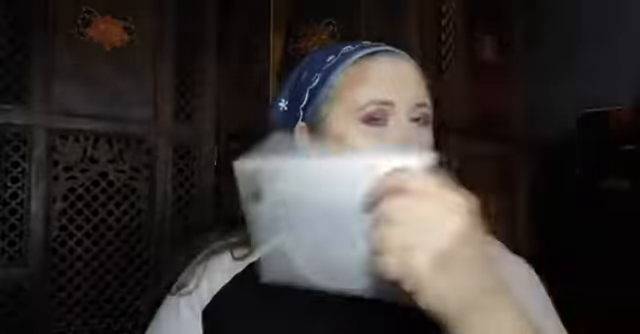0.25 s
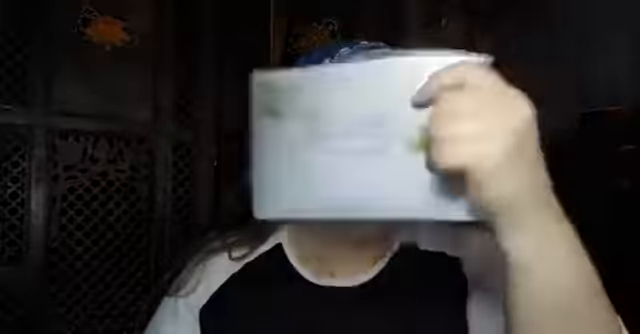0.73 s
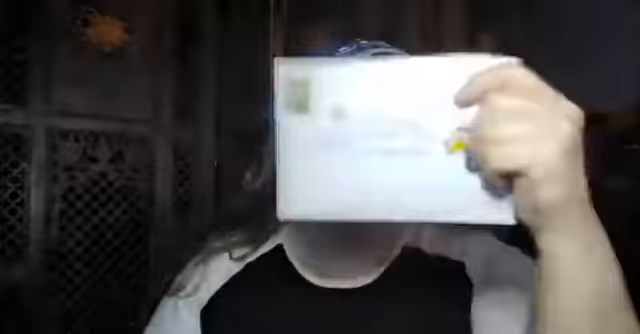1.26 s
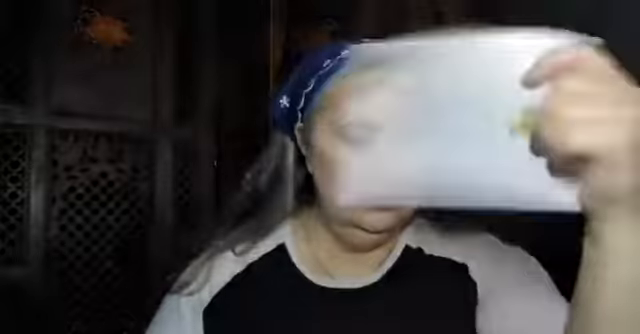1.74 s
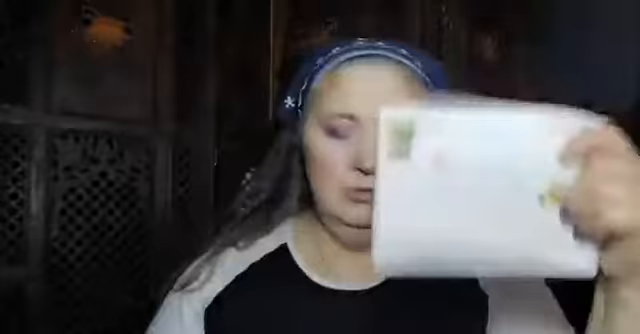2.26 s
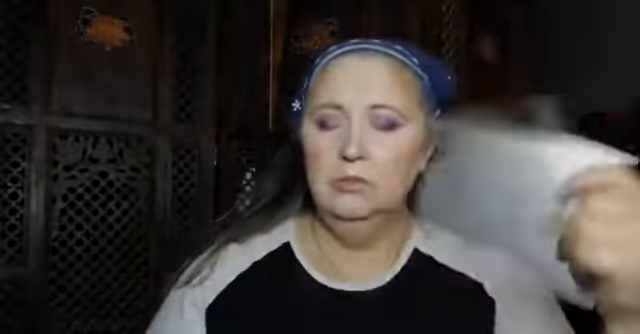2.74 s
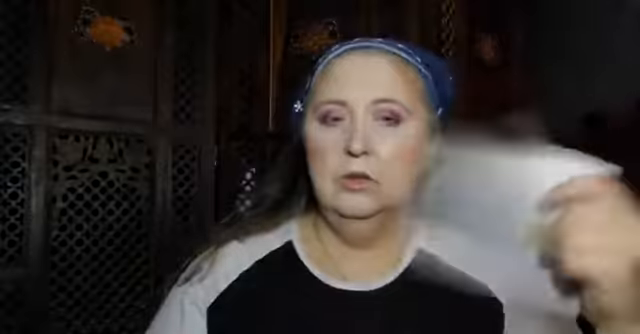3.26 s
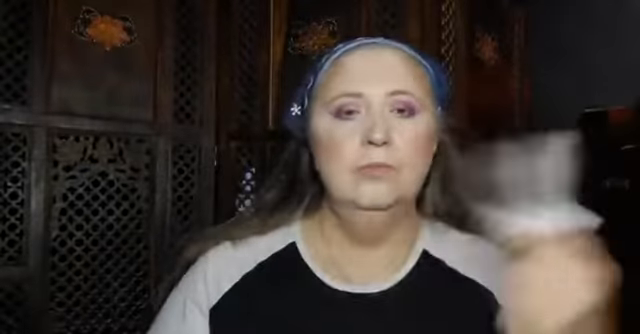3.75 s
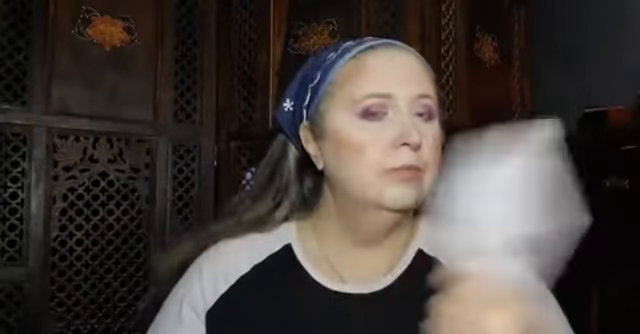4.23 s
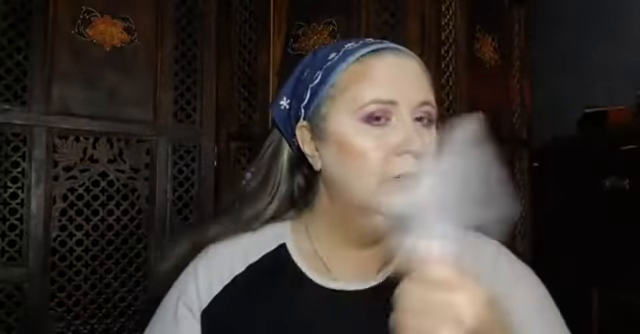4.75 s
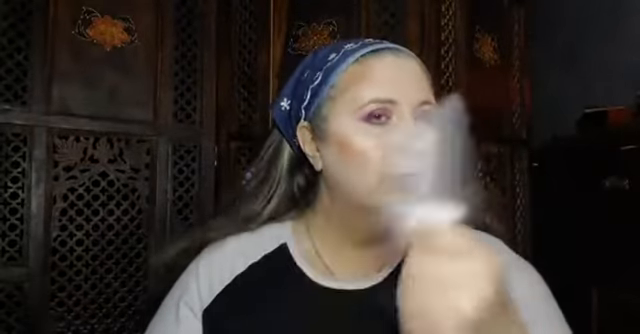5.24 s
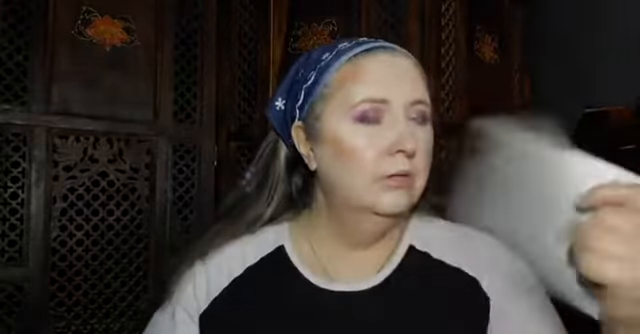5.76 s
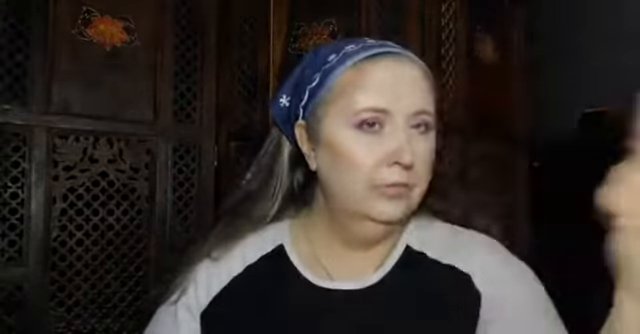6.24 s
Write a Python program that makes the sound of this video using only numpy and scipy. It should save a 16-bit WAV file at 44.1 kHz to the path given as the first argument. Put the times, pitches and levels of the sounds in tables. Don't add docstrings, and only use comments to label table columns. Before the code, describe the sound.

Rapid, even flapping of stiff paper close by, soft low puffs and dry crinkles at each turn, then two sharp cracks late on.

```python
import sys
import numpy as np
from scipy import signal
from scipy.fft import rfft, irfft
from scipy.io import wavfile
from scipy.ndimage import uniform_filter1d

SR = 44100
rng = np.random.default_rng(int(sys.argv[2]) if len(sys.argv) > 2 else 0)


def unload_wav(signal):
    wavfile.write(
        sys.argv[1],
        SR,
        np.round(np.clip(np.atleast_2d(signal).T, -1, 1) * 32767).astype(np.int16),
    )


def ratio_of_db(decibels):
    return 10 ** (np.asarray(decibels, float) / 20)


N = 286650

# (t/s, puff peak level/dB, rustle level/dB, creak level of the stroke that follows/dB)
TURNS = [(0.1116, -36.5, -55.5, -62.5), (0.372, -43.5, -56.5, -75), (0.63, -29.5, -49, -56),
         (0.8753, -33.5, -48, -60.5), (1.13, -31.5, -49, -68), (1.384, -29.5, -48, -58.5),
         (1.6411, -36, -50.5, -58.5), (1.9028, -34.5, -48.5, -53), (2.1514, -41.5, -53.5, -58.5),
         (2.4134, -29, -47.5, -58.5), (2.6718, -30, -48, -55.5), (2.921, -26, -47.5, -55),
         (3.1795, -32, -50, -57.5), (3.4327, -29.5, -51.5, -65.5), (3.688, -27, -49, -60.5),
         (3.9324, -30, -52.5, -62), (4.1755, -28, -51.5, -58.5), (4.4284, -36, -54.5, -60.5),
         (4.682, -32.5, -52, -43.5), (4.936, -46, -57, -73), (5.204, -40.5, -54.5, -56.5),
         (5.449, -34.5, -52, -60), (5.7026, -27.5, -47, -64), (5.992, -44, -58.5, -70.5),
         (6.2523, -31.5, -51, -58.5)]
# (t/s, peak level/dB, brightness/dB, length/s, bending of the whole card/dB)
HARD_SNAPS = [
    (4.7023, -20.5, -9, 0.024, -4.5),
    (5.713, -19.5, -8, 0.022, -1),
]
# (f/Hz, level/dB, time to fall 60 dB/s)
BENDING = [(205, -8, .03), (330, -3, .045), (540, 0, .045), (630, -7, .03)]
# (f/Hz, likeness from 0 to 1)
LIKENESS = [(60, 1), (300, 0.82), (640, 0.42), (1400, 0.094), (3000, 0.055), (15000, 0.16)]


def at_hz(points, hz):
    table_hz, values = np.transpose(points)
    return np.interp(np.log(hz), np.log(table_hz), values)


def rms_one(x):
    return x / np.sqrt(np.mean(x ** 2) + 1e-20)


def sides(pan_db):
    return ratio_of_db(np.array([pan_db / 2, -pan_db / 2]))[:, None]


def band(x, low_hz, high_hz):
    return signal.sosfilt(signal.butter(2, [low_hz, high_hz], "band", fs=SR, output="sos"), x)


def ring(x, modes):
    out = 0
    for hz, level_db, t60_s in modes:
        decay = ratio_of_db(-60 / (t60_s * SR))
        turn = 2 * np.pi * hz / SR
        push = [0, ratio_of_db(level_db) * np.sin(turn)]
        out = out + signal.lfilter(push, [1, -2 * decay * np.cos(turn), decay ** 2], x + 1e-18)
    return out


def add(out, piece, s):
    i = round(s * SR)
    out[:, i:i + piece.shape[1]] += piece[:, :N - i]


def swell(t, rise_s, hold_s, fall_s):
    return np.exp(np.minimum(t, 0) / rise_s - np.maximum(t - hold_s, 0) / fall_s)


def coloured(spectrum, grain_db):
    hz = np.maximum(np.fft.rfftfreq(N, 1 / SR), 1)
    clumps = np.repeat(rng.standard_normal(N // 32 + 1), 32)[:N]
    mid, side = rfft(rng.standard_normal((2, N)) * ratio_of_db(grain_db * clumps))
    alike = np.clip(at_hz(LIKENESS, hz), 0, 1)
    both = np.sqrt(1 + alike) * mid + np.sqrt(1 - alike) * side * [[1], [-1]]
    outside = (hz > 1.5 * spectrum[-1][0]) | (hz < spectrum[0][0] / 1.5)
    shape_db = at_hz(spectrum, hz) - 30 * outside
    return rms_one(irfft(both * ratio_of_db(shape_db), N))


def patchy(x, patch_db):
    hz, _, cells = signal.stft(x, SR, nperseg=512)
    field = rng.standard_normal(cells.shape[1:])
    field = uniform_filter1d(field, size=3, axis=0)
    field = uniform_filter1d(field, size=9, axis=1)
    dips = np.minimum(rms_one(field), .5)
    patchy_below_hz = 7500
    depth_db = patch_db / (1 + (hz[:, None] / patchy_below_hz) ** 4)
    return signal.istft(cells * ratio_of_db(depth_db * dips), nperseg=512)[1][:, :N]


def flutter(step_s, depth_db):
    knots = np.arange(0, N / SR + 1, step_s)
    return ratio_of_db(depth_db * np.interp(np.arange(N) / SR, knots, rng.standard_normal(len(knots))))


def creak():
    # (f/Hz, level per Hz/dB)
    creak_colour = [(300, -7.5), (600, 5), (950, -19.5), (1250, -12), (2100, -7.5), (3300, -11),
                    (4500, -9.5), (6000, -19.5), (9000, -19.5)]
    hiss_colour = [(1000, -37), (2000, -9.5), (4400, -4), (6050, -6), (7300, -4), (13600, -4), (16500, 1)]
    air_colour = [(15, -52), (28, -1.5), (55, 2), (112, 1), (200, -14.5), (330, -14), (530, -23.5),
                  (750, -26.5), (1000, -40), (2000, -42.5)]
    # (t/s, hiss level at rest/dB, swell of the hiss with the stroke/dB)
    hiss_drift = [(0.0, -66.5, -1), (0.45, -68.5, -1.5), (0.69, -68, -4), (0.78, -71, 7), (2.01, -77.5, 15.5),
                  (2.08, -71.5, 8), (2.66, -72.5, 6.5), (3.33, -68.5, 4.5), (3.71, -70, 1.5),
                  (4.09, -66.5, 3), (5.09, -72, 3.5), (5.63, -68.5, 3.5), (6.01, -75.5, 8), (6.5, -72, 13)]
    fastest_s, slowest_s = 0.075, 0.22
    rest_db, typical_db = -82.5, -62

    t = np.arange(N) / SR
    s, _, _, stroke_db = np.transpose(TURNS)
    moments = np.ravel([s + fastest_s, s + slowest_s], order="F")
    speed = np.interp(t, np.r_[0, moments], np.r_[0, np.tile([1, 0], len(s))])
    strength_db = np.interp(t, s + fastest_s, stroke_db)
    creak_db = rest_db + speed * (strength_db - rest_db)
    crackle = ratio_of_db(creak_db - 2.5) * patchy(coloured(creak_colour, grain_db=2.5), patch_db=11)

    when, hiss_rest_db, swell_db = np.transpose(hiss_drift)
    stroke_swell_db = np.interp(t, when, swell_db) + 0.14 * (strength_db - typical_db)
    hiss_db = np.interp(t, when, hiss_rest_db) + 2.5 + speed * stroke_swell_db
    hiss = ratio_of_db(hiss_db) * patchy(coloured(hiss_colour, grain_db=1), patch_db=8)
    hiss = hiss * flutter(.012, depth_db=1.5)

    stirred_air = ratio_of_db(-52 + 1.5 * speed) * coloured(air_colour, grain_db=1)
    return sides(-2.36) * (crackle + hiss + stirred_air)


def turns():
    # (f/Hz, level per Hz/dB)
    rustle_colour = [(600, -14), (950, -13.5), (1500, -9), (2070, -0.5), (2900, -14.5), (3600, -12.5),
                     (4500, -5), (6000, -16.5)]
    sizzle_colour = [(3000, -22), (6000, -9.5), (7400, -4.5), (10000, -6.5), (13600, -9), (16500, -4)]
    puff_hz, puff_s, puff_lag_s = 108, .0047, .0018
    pan_db, swell_s, lead_s = -3, .0055, .04

    t = np.arange(round(.12 * SR)) / SR - lead_s
    puff = -np.cos(2 * np.pi * puff_hz * t) * np.exp(-.5 * ((t - puff_lag_s) / puff_s) ** 2)
    puff -= 0.45 * np.exp(-.5 * ((t - .013) / 0.0031) ** 2)
    throb = ratio_of_db(2 * np.cos(2 * np.pi * puff_hz * (t + .001)))
    shake_swell = swell(t, 0.0071, 0.0092, 0.0066)
    rustle_swell = throb * swell(t + 0.00028, swell_s, 0.013, 0.0098)
    sizzle_swell = swell(t + 0.0005, swell_s, 0.012, 0.009)

    air, shake, rustle, sizzle = np.zeros((4, 2, N))
    for s, puff_db, rustle_db, _ in TURNS:
        bend_db = -49.5 + 0.44 * (puff_db + 31) + 0.17 * (rustle_db + 45)
        add(air, sides(-2.8) * ratio_of_db(puff_db) * puff, s - lead_s)
        add(shake, sides(pan_db) * ratio_of_db(bend_db) * shake_swell, s - lead_s)
        add(rustle, sides(pan_db) * ratio_of_db(rustle_db - 1) * rustle_swell, s - lead_s)
        add(sizzle, sides(pan_db) * ratio_of_db(rustle_db + 1) * sizzle_swell, s - lead_s)

    force = shake * (rng.standard_normal(N) + 0.068 * rng.standard_normal((2, N)))
    bending = ratio_of_db(-20) * ring(force, BENDING) + ratio_of_db(17.5) * band(force, 137, 516)
    creases = flutter(.0025, depth_db=3.5)
    rustling = creases * rustle * patchy(coloured(rustle_colour, grain_db=1.5), patch_db=7)
    sizzling = creases * sizzle * coloured(sizzle_colour, grain_db=2.5)
    return air, bending + rustling + sizzling


def snaps():
    # (t/s, peak level/dB, brightness/dB, length/s)
    whips = [(0.163, -47.5, -28, 0.021), (0.42, -50, -28, 0.016), (0.6827, -44, -20, 0.03),
             (0.9323, -34, -37, 0.012), (1.1828, -40, -41, 0.023), (1.444, -37, -21, 0.014),
             (1.698, -32, -50, 0.011), (1.9633, -33.5, -34, 0.015), (2.205, -43, -27, 0.0075),
             (2.471, -45, -13, 0.02), (2.727, -46, -20, 0.022), (2.975, -46.5, -15, 0.025),
             (3.275, -56, -17, .0088), (3.484, -48, -20, 0.019), (3.737, -48, -21, 0.026),
             (3.977, -52, -19, 0.033), (4.4775, -44, -19, 0.0065), (5.261, -48.5, -20, 0.011),
             (5.502, -46.5, -48, 0.021), (6.295, -42, -34, 0.023)]
    # (t/s, peak level/dB)
    ticks = [(0.231, -56), (0.969, -57), (1.2287, -54.5), (1.981, -61), (2.505, -52.5), (2.7667, -54),
             (4.5216, -59.5), (5.542, -59), (5.5987, -52.5), (5.7912, -39.5), (6.101, -56.5), (6.345, -68)]
    # (f/Hz, level/dB, time to fall 60 dB/s)
    crinkle_modes = [(1350, -3, .007), (1650, -4, .006), (2150, -1, .006), (2650, -2, .006),
                     (3400, -3, .005), (4600, -3, .004)]
    snap_bend_db, snap_pan_db = -7.5, -1
    tick_bright_db, tick_s, tick_bend_db, tick_pan_db = -14, 0.02, 1, -3.5

    events = [(*row, snap_pan_db) for row in HARD_SNAPS]
    events += [(*row, snap_bend_db, snap_pan_db) for row in whips]
    events += [(*row, tick_bright_db, tick_s, tick_bend_db, tick_pan_db) for row in ticks]
    hard_times = [row[0] for row in HARD_SNAPS]

    t = np.arange(round(.08 * SR)) / SR
    low, mid, top = np.zeros((3, 2, N))
    for s, peak_db, bright_db, length_s, bend_db, pan_db in events:
        size, both, left, right = rng.standard_normal((4, len(t)))
        rise_s = .0004 * ratio_of_db(.8 * abs(-35 - peak_db))
        fade = (1 - np.exp(-t / rise_s)) * np.exp(-3 * t / max(length_s, .002))
        dying = sides(pan_db) * ratio_of_db(peak_db) * fade
        clumps = ratio_of_db(3 * np.repeat(size[::24], 24)[:len(t)])
        spray = dying * rms_one(clumps * (0.35 * both + np.array([left, right])))
        knock = 2 * np.hanning(24) * sides(pan_db) * ratio_of_db(peak_db + bend_db)
        crinkle_db = -1.5 if s in hard_times else 0
        add(low, knock, s)
        add(low, .5 * ratio_of_db(bend_db) * dying * both, s)
        add(mid, ratio_of_db(crinkle_db) * spray, s)
        add(top, ratio_of_db(bright_db) * spray, s)

    broad = signal.lfilter(*signal.butter(1, [1100, 5000], "band", fs=SR), mid)
    crinkle = ratio_of_db(-20) * ring(mid, crinkle_modes) + ratio_of_db(2) * broad
    sizzle = ratio_of_db(1) * band(top, 4300, 15000)
    return ratio_of_db(-25.5) * ring(low, BENDING) + crinkle + sizzle


def cracks():
    rise_s, fall_s = 0.0028, 0.0082
    out, t = np.zeros((2, N)), np.arange(round(.1 * SR)) / SR
    fade = (1 - np.exp(-t / rise_s)) * np.exp(-t / fall_s)
    for s, peak_db, *_ in HARD_SNAPS:
        clumps = ratio_of_db(2.1 * np.repeat(rng.standard_normal(len(t) // 40 + 1), 40)[:len(t)])
        burst = rms_one(clumps * rng.standard_normal((2, len(t))))
        add(out, ratio_of_db(peak_db + 2) * fade * burst, s)
    return sides(-1.7) * band(out, 1900, 7400)


def shoves():
    # (t/s, peak level/dB, f/Hz)
    pushes = [
        (4.705, -32, 63.4),
        (5.715, -22.5, 53.3),
    ]
    out, t = np.zeros((2, N)), np.arange(round(.1 * SR)) / SR
    for s, peak_db, hz in pushes:
        swing = -np.sin(2 * np.pi * hz * t) * np.exp(-t / 0.013)
        add(out, sides(-1.3) * ratio_of_db(peak_db) * swing, s)
    return out


def hollow(x):
    centre_hz, width_hz, dip_db = 900, 420, -16
    b, a = signal.iirpeak(centre_hz, centre_hz / width_hz, fs=SR)
    return x - (1 - ratio_of_db(dip_db)) * signal.lfilter(b, a, x)


def room(x):
    # (f/Hz, time to fall 60 dB/s)
    decay_times = [(300, 0.29), (1000, 0.26), (3000, 0.32), (8000, 0.21), (16000, 0.23)]
    t = np.arange(round(.4 * SR)) / SR
    tail = 0
    for hz in 200 * 2. ** np.arange(7):
        both, *own = rng.standard_normal((3, len(t)))
        shared = np.clip(at_hz(LIKENESS, hz), 0, 1)
        noise = np.sqrt(shared) * both + np.sqrt(1 - shared) * np.array(own)
        octave = band(noise, hz / np.sqrt(2), hz * np.sqrt(2))
        tail = tail + octave * ratio_of_db(-60 * t / at_hz(decay_times, hz))
    tail = tail * np.clip(t / 0.0095, 0, 1)
    tail = tail / np.sqrt(np.sum(tail ** 2) / 2)
    return signal.fftconvolve(x, tail, axes=1)[:, :N]


def scene():
    air, sheet = turns()
    sheet = hollow(sheet + snaps() + cracks())
    echoes = ratio_of_db(-13.5) * room(sheet)
    return creak() + air + shoves() + sheet + echoes


def band_limit(x):
    return signal.sosfilt(signal.butter(12, 16810, fs=SR, output="sos"), x)


def record(dry):
    bass_cut = signal.butter(4, 30, "high", fs=SR, output="sos")
    top_cut = signal.cheby2(12, 70, 16536, fs=SR, output="sos")
    mix = signal.sosfilt(np.vstack([bass_cut, top_cut]), dry)
    return band_limit(mix)


dry = scene()
out = record(dry)
unload_wav(out)
```